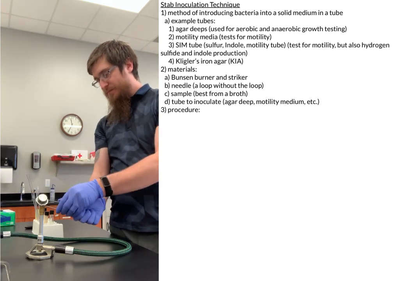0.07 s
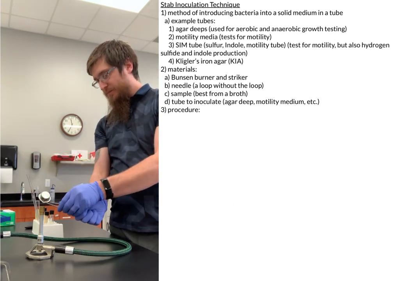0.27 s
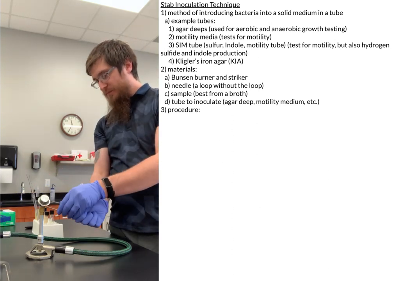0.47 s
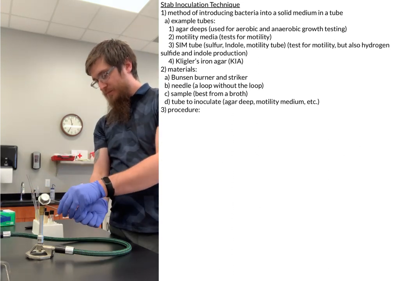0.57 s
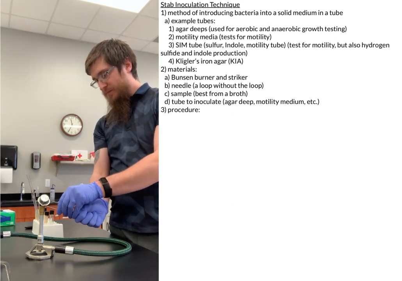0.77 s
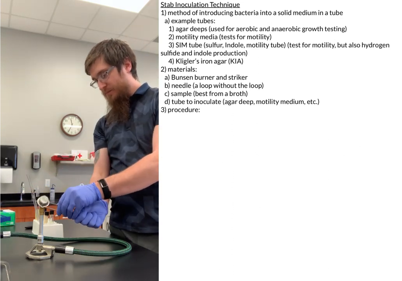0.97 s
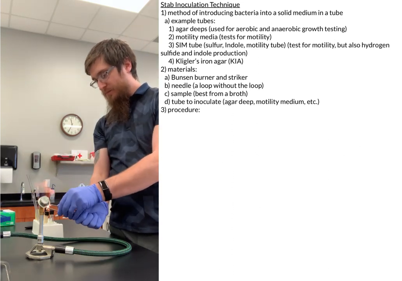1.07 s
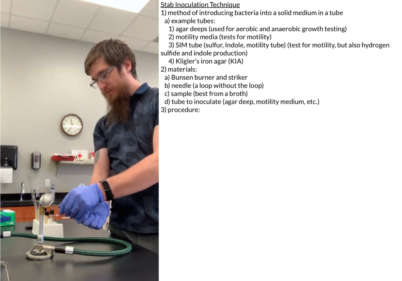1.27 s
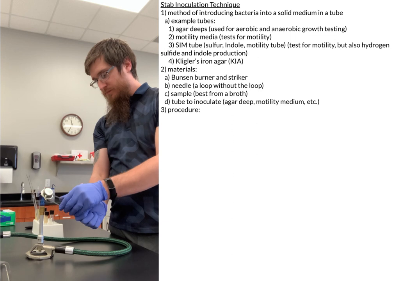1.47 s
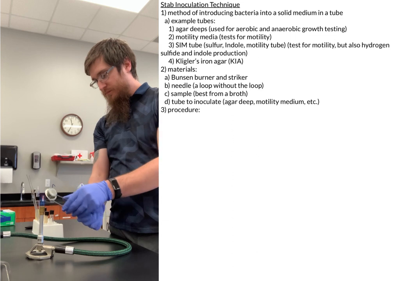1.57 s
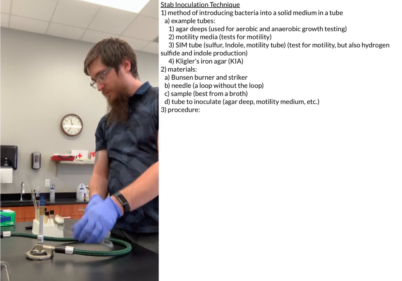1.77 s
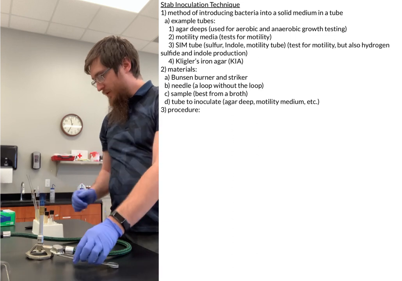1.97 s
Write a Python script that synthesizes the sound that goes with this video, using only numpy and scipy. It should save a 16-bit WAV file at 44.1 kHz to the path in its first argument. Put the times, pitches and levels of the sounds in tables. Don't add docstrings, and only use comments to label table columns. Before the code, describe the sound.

A steel flint striker scrapes lightly at 0.14-0.23 seconds, then snaps harder at 0.48 and 0.92-1.02, with gritty rasps, tiny squeals and handle knocks. Low ventilation and thin gas hiss run throughout. At 1.04 gas lights with a soft low whump, then flutters and hisses. Sharp bright snaps follow at 1.31 and 1.48, a weaker one at 2.01, ringing briefly off hard lab walls.

```python
import sys
import numpy as np
from scipy import signal
from scipy.fft import rfft, irfft, next_fast_len
from scipy.io import wavfile
from scipy.ndimage import uniform_filter1d, minimum_filter1d

SR = 44100
rng = np.random.default_rng(int(sys.argv[2]) if len(sys.argv) > 2 else 0)


def linear_from_db(decibels):
    return 10 ** (np.asarray(decibels, float) / 20)


def int16_out(signal):
    q = np.round(np.clip(np.atleast_2d(signal).T, -1, 1) * 32767)
    wavfile.write(sys.argv[1], SR, q.astype(np.int16))


N = 89170
TIME_S = np.arange(N) / SR
LEFT_RIGHT = np.array([[1], [-1]])
LIGHTS_S = 1.035


def level(x, db):
    return x * linear_from_db(db) / np.sqrt(np.mean(x ** 2))


def colour(x, table):
    n = next_fast_len(N + 4096)
    hz = np.maximum(np.arange(n // 2 + 1) * SR / n, 1)
    points = np.array(table, float)
    gain = linear_from_db(np.interp(np.log(hz), np.log(points[:, 0]), points[:, 1]))
    return irfft(rfft(x, n) * gain, n)[..., :N]


def ring(x, hz, t60_s):
    pole = np.exp(2j * np.pi * hz / SR - np.log(1000) / (max(t60_s, .001) * SR))
    return signal.lfilter([1], [1, -pole], x)


def walk(rate_hz):
    k = int(SR / rate_hz)
    steps = np.repeat(rng.standard_normal(N // k + 1), k)
    return 0.69 * uniform_filter1d(uniform_filter1d(steps, k), k)[:N]


def grains(per_s, spread_db):
    chance, sign, size = rng.random((3, N))
    clicks = (chance < per_s / SR) * np.sign(sign - .5) * linear_from_db(-spread_db * np.log(1 - size))
    return level(clicks, 0)


def thuds(table):
    out = np.zeros(N)
    for start_s, db, hz, t60_s in table:
        age_s = np.maximum(TIME_S - start_s, 0)
        out += linear_from_db(db) * np.sin(2 * np.pi * hz * age_s) * np.exp(-np.log(1000) * age_s / t60_s)
    return out


def two_ports(left_db, lead_rad):
    return linear_from_db(left_db / 2 * LEFT_RIGHT) * np.exp(-1j * lead_rad * np.array([[0], [1]]))


def stereo_noise(table, db, mono_hz, flicker_db):
    mid, side = (colour(rng.standard_normal(N), table) for _ in range(2))
    side = signal.lfilter(*signal.butter(1, mono_hz, "high", fs=SR), side)
    return level(mid + side * LEFT_RIGHT, db) * linear_from_db(flicker_db * walk(10.5))


def ventilation():
    # frequency in Hz, level in dB per Hz.
    air = [(22, -9), (56, -1), (108, -12.5), (170, -16.5), (380, -35), (2200, -59.5)]
    return stereo_noise(air, -56.5, mono_hz=400, flicker_db=5.6)


def gas_jet():
    # frequency in Hz, level in dB per Hz.
    jet = [(1200, -29), (1650, -2.5), (2000, -23.5), (4500, -9.5), (6600, -11), (10200, -15.5), (12500, 8),
           (15800, -22)]
    return stereo_noise(jet, -62, mono_hz=620, flicker_db=0.44)


def striker():
    # start in seconds, level in dB at file teeth, cup rim, cup, arms.
    snaps = [(0.136, -50.5, -54, -59, -56), (0.167, -45, -44, -59, -53), (0.1754, -34, -38, -34, -32),
             (0.18, -44, -56, -60, -42), (0.1998, -24.5, -25.5, -34, -57), (0.212, -42, -32, -39, -54),
             (0.2266, -30.5, -33.5, -36, -65), (0.4826, -17, -16, -52, -18),
             (0.5006, -15.5, -13, -17.5, -34), (0.9211, -52, -22.5, -29, -58),
             (0.958, -23, -16.5, -30.5, -24.5), (0.971, -45, -52.5, -44, -64), (.994, -36, -28.5, -40, -53),
             (1.0241, -6.5, -18, -20, -23), (1.3095, -6, -27, -6.5, -18), (1.314, -6.5, -9, -20.5, -39),
             (1.4718, -23, -32.5, -27, -43), (1.479, -30, -40, -22, -45), (1.49, -36, -52, -21, -49),
             (1.4941, -4.5, -45, -19, -19), (2.009, -37, -52, -57, -43), (2.012, -20, -37, -55, -16.5)]
    # start in
    # seconds, length in seconds, level in dB at file teeth, cup, arms.
    drags = [(0.149, 0.012, -66, -80, -55.5), (0.162, 0.018, -44, -52, -34), (0.177, 0.022, -45, -46, -41),
             (0.197, 0.019, -49, -57, -41), (0.22, 0.0063, -40, -50, -39), (0.464, 0.015, -64, -65, -45.5),
             (.478, 0.021, -24.5, -26.5, -33.5), (0.915, 0.012, -66, -59, -47),
             (0.951, 0.022, -46, -63, -45.5), (1.0249, 0.0045, -13.5, -22, -15),
             (1.296, 0.01, -52, -60, -52), (1.307, 0.005, -47, -30, -21.5),
             (1.463, 0.024, -37.5, -31.5, -63), (1.483, 0.0055, -29.5, -23, -52),
             (2.005, 0.014, -43.5, -35, -40)]
    # frequency in Hz, level in dB, t60 in seconds.
    teeth = [(11470, -11, 0.0065), (12120, -6.5, 0.0056), (13250, -6.5, 0.0055), (13560, -20.5, 0.011),
             (15300, -48, 0.001), (9100, -16, 0.0044)]
    rim = [(10770, -3, .008), (10740, -21, .06), (8580, -12, .006), (7800, -15, .004)]
    cup = [(5365, -22, .05), (5330, -3, .008), (5700, -9, .004), (5080, -8, .005)]
    arms = [(4580, -11.5, 0.0027), (3860, -3.5, 0.0068), (3670, -12.5, 0.0084), (4170, -5.5, 0.01),
            (7400, -9.5, 0.0021), (1060, -23, .005), (4330, -1.5, 0.0012), (3120, -16, 0.001)]
    spring = [(2905, -3.5, 0.018), (2860, -48, 0.0033), (2307, -9, 0.03), (870, -15, 0.057)]
    # snap gain in dB, drag gain in dB.
    snap_db = (8, 3.5, 3.5, -3, -47)
    drag_db = (8, 12, 2, 1, 1.5)
    # left over right in dB, left phase lead in radians.
    left_louder_db = (4.7, 5.8, 5.4, 8.9, 5.3)
    left_leads_rad = (-0.75, -1.99, -1.55, -1.85, -0.21)
    # frequency in Hz, gain in dB.
    radiation = [(200, -61), (600, -25), (1300, -15.5), (1800, -18.5), (2300, -15.5), (2700, -7.5),
                 (5900, 0), (6300, -6), (6900, -6), (7200, -0.5), (16000, -4.5)]
    snap_s, rise_s, fall_s, scatter_db = 0.0007, 0.0038, 0.0004, 2.76

    grit = grains(4000, 1.5) + 0.31 * rng.standard_normal(N)
    crack = rng.standard_normal(N)
    forces = []
    for row in snaps:
        age = np.maximum(TIME_S - row[0], 0) / snap_s
        forces.append(age * np.exp(1 - age) * crack * 0.18)
    for row in drags:
        start_s, length_s = row[:2]
        swell = np.minimum((TIME_S - start_s) / rise_s, (start_s + length_s - TIME_S) / fall_s)
        forces.append(np.clip(swell, 0, 1) * grit * 0.19)
    forces = np.array(forces)

    out = np.zeros((2, N))
    snap_columns, drag_columns = (1, 2, 3, 4, 3), (2, 2, 3, 4, 3)
    for part, modes in enumerate((teeth, rim, cup, arms, spring)):
        force_db = [row[snap_columns[part]] + snap_db[part] for row in snaps]
        force_db += [row[drag_columns[part]] + drag_db[part] for row in drags]
        ports = two_ports(left_louder_db[part], left_leads_rad[part])
        for hz, mode_db, t60_s in modes:
            scatter = scatter_db * rng.standard_normal(len(force_db))
            gain = linear_from_db(np.array(force_db) + mode_db + scatter)
            out += (ring(gain @ forces, hz, t60_s) * ports).imag
    return colour(out, radiation)


def squeals():
    starts_s = [.153, .163, .470, .478, .493, 1.021, 1.298, 1.465, 1.484, 1.469, 1.479, 2.006, .917, .955]
    # length in seconds, frequency in Hz, level in dB.
    tones = [(0.0083, 4850, -43.5), (.009, 4750, -28), (0.015, 2940, -38.5), (0.0064, 2950, -22),
             (0.0079, 5400, -23.5), (0.0047, 4700, -29.5), (0.01, 4750, -35), (0.0056, 2916, -29.5),
             (0.0073, 2850, -28.5), (.008, 5600, -23.5), (0.0072, 5700, -21), (0.0068, 4580, -25),
             (0.0057, 5100, -35), (.005, 4700, -36)]
    fade_s, rough_db = 0.0026, 5.5
    out = 0
    for start_s, (length_s, hz, db) in zip(starts_s, tones):
        swell = np.clip((TIME_S - start_s) / length_s, 0, 1) ** 0.74
        fade = np.exp(-np.maximum(TIME_S - start_s - length_s, 0) / fade_s)
        out = out + linear_from_db(db) * swell * fade * np.exp(2j * np.pi * hz * TIME_S)
    return (out * linear_from_db(rough_db * walk(600)) * two_ports(6.5, -1.02)).imag


def handle_knocks():
    # start in seconds, level in dB, frequency in Hz, t60 in seconds.
    knocks = [
        (.165, -51, 1600, .03),
        (.484, -39, 790, .05),
        (.497, -42, 780, .04),
        (.921, -48, 1250, .015),
        (.921, -53, 900, .015),
        (.958, -46, 1000, .02),
        (.958, -48, 1400, .015),
        (.96, -50, 500, .03),
        (1.024, -43, 1250, .015),
        (1.024, -46, 850, .015),
    ]
    return thuds(knocks)


def flame():
    # frequency in Hz, level in dB per Hz.
    rumble = [(53, -43), (90, -2.5), (157, 0), (320, -0.7), (433, -9.5), (676, -3.5), (766, -10.5),
              (1040, -6.5), (1620, -23.5), (2500, -32), (3250, -20), (5500, -120)]
    smear = [
        [.941, -1.938, 1, 1, -1.938, .941],
        [.9, -1.885, 1, 1, -1.885, .9],
    ]
    # start in seconds, level in
    # dB.
    large_puffs = [(1.094, -54), (1.154, -40), (1.179, -48), (1.199, -57), (1.254, -44.5), (1.265, -38),
                   (1.331, -44), (1.348, -38), (1.369, -37), (1.414, -41), (1.474, -35.5), (1.513, -38.5),
                   (1.555, -43), (1.588, -33.5), (1.727, -48), (1.765, -48), (1.8, -43), (1.859, -41),
                   (1.901, -56.5), (1.956, -42.5), (2.01, -31.5)]
    # start in
    # seconds, level in dB, frequency in Hz, t60 in seconds.
    pops = [(1.046, -41, 900, .02), (1.048, -31, 190, .05), (1.05, -36, 60, .1), (1.05, -28, 320, .045),
            (1.059, -34, 1050, .014), (1.06, -29, 150, .07), (1.062, -38, 580, .02), (1.088, -39, 150, .08),
            (2.008, -39, 900, .02), (1.594, -40, 700, .009), (2.009, -34, 1800, .02),
            (1.062, -35, 300, .04), (2.009, -34, 1400, .02)]
    flare_db, flare_s, puffs_per_s, puff_gain_db = 12, 0.014, 150, 34

    age_s = TIME_S - LIGHTS_S
    puffs = signal.sosfilt(smear, grains(puffs_per_s, 2.5)) + 0.5 * rng.standard_normal(N)
    puffs = level(colour(puffs, rumble), -55)
    flare = flare_db * np.exp(-np.maximum(age_s, 0) / flare_s)
    small = puffs * np.clip(age_s / 0.011, 0, 1) * linear_from_db(flare + 1.5 * walk(10.975))

    large = np.zeros(N)
    for start_s, db in large_puffs:
        large[int(start_s * SR)] = linear_from_db(db + puff_gain_db)
    large = colour(signal.sosfilt(smear + smear, large), rumble)
    return small + large + thuds(pops)


def flame_hiss():
    # frequency in Hz, level in dB per Hz.
    hiss = [(1180, -19), (2000, -9), (5430, -14), (8330, -20.5), (11000, -9.5), (14300, -26), (22000, -120)]
    lit = np.clip((TIME_S - LIGHTS_S) / 0.013, 0, 1)
    return lit * stereo_noise(hiss, -62.5, mono_hz=670, flicker_db=0.52)


def room(x):
    # band centre in Hz, t60 in seconds, level in dB.
    bands = [(199, 0.29, -6.5), (600, 0.28, -16.5), (1500, 0.29, -9.5), (2970, 0.92, -15),
             (3430, 0.83, -12), (5130, 0.95, -14.5), (7900, 0.64, -15.5), (11400, 0.45, -16),
             (12800, 0.38, -22)]
    bench_s, bench_share, first_wall_s, build_s = 0.001, 0.55, 0.0115, 0.003
    wall_db, wall_s, mono_hz = 4.5, 0.045, 485

    t = TIME_S - first_wall_s
    noise = rfft(rng.standard_normal((2, N)))
    log_hz = np.log(np.maximum(np.arange(N // 2 + 1) * SR / N, 1))
    log_centres = np.log([row[0] for row in bands])
    onset = np.clip(t / build_s, bench_share, 1) * (t > bench_s - first_wall_s)
    walls_db = wall_db * np.exp(-np.abs(t) / wall_s)
    tail = 0
    for k, (_, t60_s, db) in enumerate(bands):
        weight = np.interp(log_hz, log_centres, np.arange(len(bands)) == k)
        decay = linear_from_db(db - 2.0 - 60 * t / t60_s + walls_db) * np.sqrt(14 / (t60_s * SR))
        tail = tail + irfft(noise * weight, N) * decay * onset
    mid = tail[0]
    side = signal.lfilter(*signal.butter(1, mono_hz, "high", fs=SR), tail[1])
    tail = np.array([mid + side, mid - side]) / np.sqrt(2)
    return signal.fftconvolve(x[None], tail, axes=1)[:, :N]


def scene():
    # time in seconds, extra left over right in dB.
    turn = [(0, -4.7), (.5, 0.5), (.95, -2), (1.3, 1.5), (2.0, 0)]
    background = ventilation() + gas_jet()
    tool = striker() + squeals() + handle_knocks()
    fire = flame()
    turn_db = np.interp(TIME_S, *np.transpose(turn))
    direct = tool * linear_from_db(turn_db / 2 * LEFT_RIGHT) + fire * linear_from_db(-0.6 * LEFT_RIGHT)
    return direct + room(tool[0] + 2 * fire) + flame_hiss() + background


def roll_off(x):
    return signal.sosfilt(signal.butter(12, 16670, fs=SR, output="sos"), x)


def record(dry):
    # frequency in Hz, gain in dB.
    port_dip = [(5800, 0.06), (6200, -7.5), (6900, -4), (7200, 0.2)]
    limit_db, ratio, hold_s, slew_s = -21.5, 1.895, 0.0085, 0.001
    mono_above_hz, top_side, top_hz = 11800, 0.083, 15900

    hold = int(hold_s * SR)
    loud = np.sqrt(uniform_filter1d(np.mean(dry ** 2, axis=0), size=40))
    over_db = np.maximum(20 * np.log10(loud + 1e-9) - limit_db, 0)
    duck_db = -over_db * (1 - 1 / ratio)
    duck_db = minimum_filter1d(duck_db, hold + 1, origin=hold // 2 - 20)
    x = colour(dry, port_dip) * linear_from_db(uniform_filter1d(duck_db, int(slew_s * SR) + 1))

    top = signal.sosfiltfilt(signal.butter(8, mono_above_hz, "high", fs=SR, output="sos"), x)
    x = x - top + top[0] + top_side * (top[0] - top[1]) * LEFT_RIGHT
    x = signal.sosfilt(signal.ellip(8, .2, 70, top_hz, fs=SR, output="sos"), x)
    return roll_off(x)


dry = scene()
out = record(dry)
int16_out(out)
```